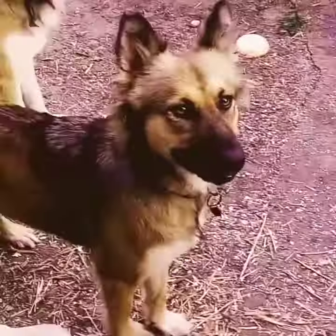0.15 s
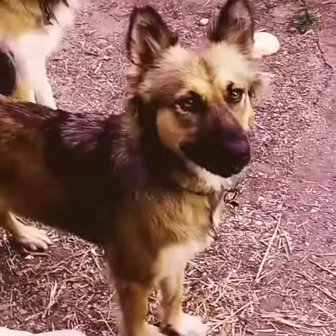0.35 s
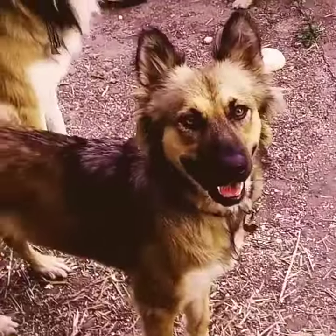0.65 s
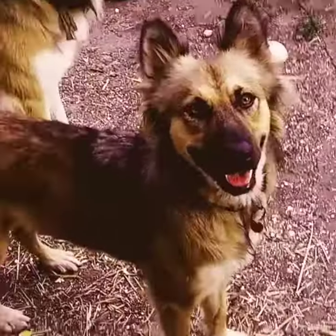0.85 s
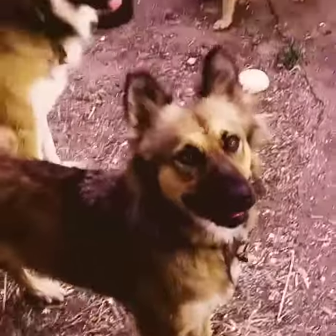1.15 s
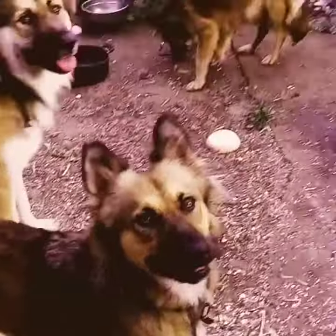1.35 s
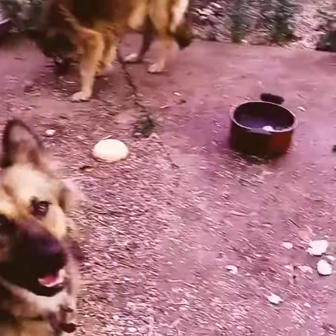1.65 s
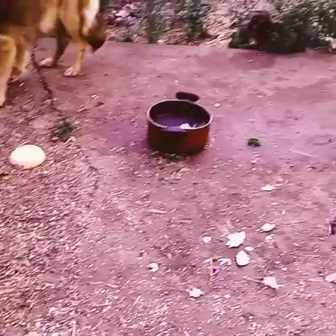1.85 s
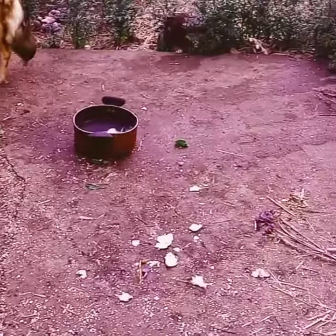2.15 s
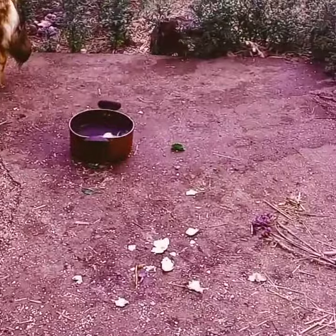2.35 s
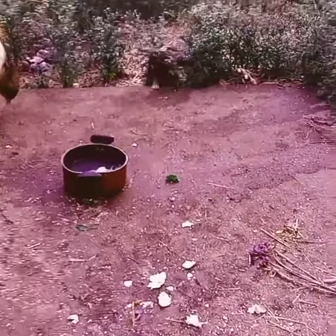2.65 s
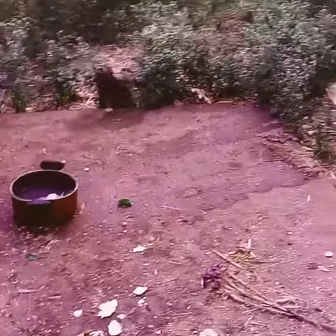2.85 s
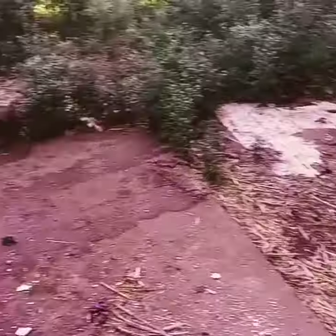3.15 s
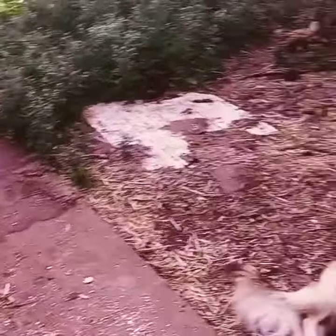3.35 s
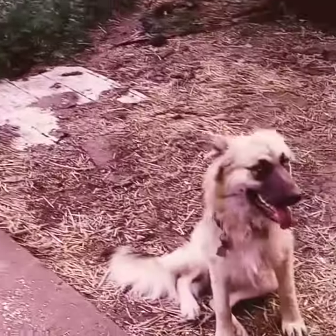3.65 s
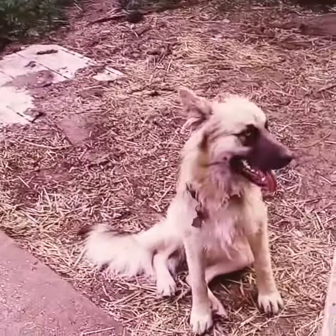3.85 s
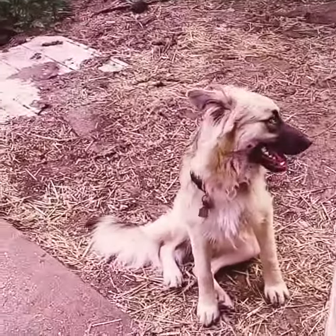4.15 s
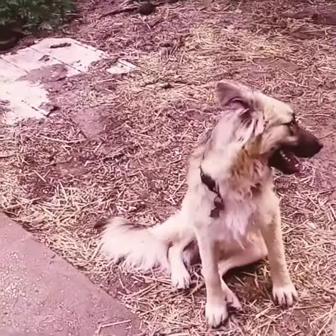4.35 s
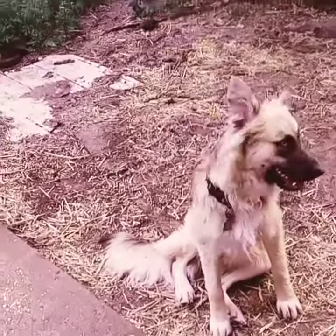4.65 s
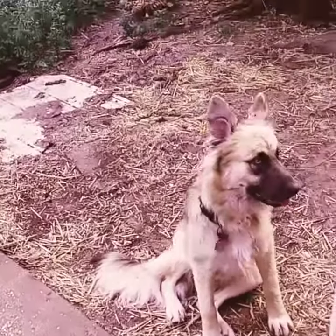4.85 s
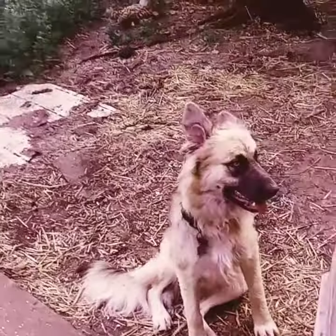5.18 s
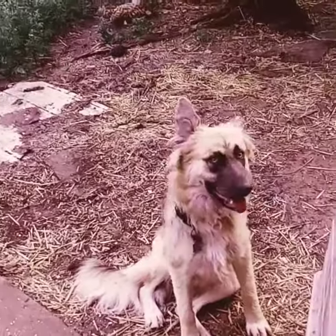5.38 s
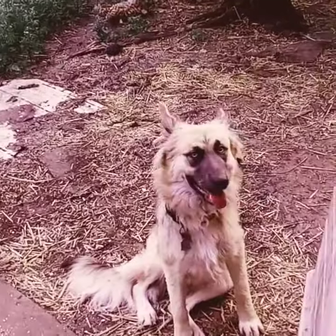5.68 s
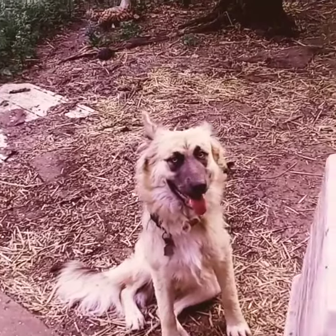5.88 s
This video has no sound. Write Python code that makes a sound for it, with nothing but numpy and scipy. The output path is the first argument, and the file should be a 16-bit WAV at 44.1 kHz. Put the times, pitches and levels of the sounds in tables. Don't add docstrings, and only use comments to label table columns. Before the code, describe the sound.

Outdoors in a dirt yard, a rubber squeaker toy is squeezed rapidly very close to a phone. Shrill, nasal, whining squeaks alternate between the outward squeeze and lower inward release, loudest and highest around one and a half seconds. Collar tags tick near one second. After nearly four seconds comes a quiet gap with distant hum, small ticks and an airy leak, then duller, rougher squeaks to the end. A nearby wall returns short echoes.

```python
import sys
import numpy as np
from scipy import signal
from scipy.fft import rfft, irfft, next_fast_len
from scipy.io import wavfile
from scipy.ndimage import uniform_filter1d

SR = 44100
rng = np.random.default_rng(int(sys.argv[2]) if len(sys.argv) > 2 else 0)


def gain_from_db(level_db):
    decades = np.asarray(level_db, float) / 20
    return 10 ** decades


def dump(signal):
    limited = np.clip(np.atleast_2d(signal).T, -1, 1)
    pcm = np.round(limited * 32767).astype(np.int16)
    wavfile.write(sys.argv[1], SR, pcm)


N = 265482

# hz, level_db (per Hz)
YARD_SPECTRUM = [(15, -42), (25, -2.5), (152, -1.5), (537, -22), (782, -8.5), (871, -16.5), (1380, -12),
                 (1710, -17.5), (2010, -15.5), (4870, -24), (5430, -19.5), (6040, -26), (9290, -24.5),
                 (15500, -68)]
YARD_DB = -44.5
# time_s, above_4_khz_db
YARD_TREBLE = [
    (0, 9),
    (2.0, 1),
    (4.0, -2.5),
    (5.0, -2),
]
# pitch_hz, level_db
WHINES = [(1384, -57), (5351, -61.5), (9109, -62.5)]
WHINE_FROM_S = 3.4
TAG_HZ = [6300, 8100, 11960, 15250]
# time_s, level_db
JINGLE = [
    (.84, -62),
    (.9, -54.5),
    (1.22, -55.5),
]
# start_s, peak_db, ring_hz, crack_db
TICKS = [
    (1.114, -13.5, 8540, -8.5),
    (1.155, -30, 470, -6),
    (1.183, -26.5, 2400, 0.5),
    (4.285, -25, 340, -6),
    (4.375, -25, 1060, 2),
    (4.429, -29, 3650, -2),
    (4.863, -20.5, 2530, -11),
]
# time_s, level_db, centre_hz
LEAKS = [
    [(4.47, -71, 6950), (4.52, -42.5, 7000), (4.555, -41, 6430)],
    [(4.77, -39, 5000), (4.85, -42, 4900), (4.935, -40, 5000), (4.955, -71, 5150)],
]
# delay_s, level_db
ECHOES = [
    (.0021, -51),
    (.0068, 2),
    (0.057, -19.5),
]
TAIL_DB, TAIL_T60_S, TAIL_TREBLE_T60_S = -14.5, 0.54, 0.44
# time_s, level_db
FACING = [
    (0, -10),
    (1.0, -8),
    (2.0, -7.5),
    (3.9, -9.5),
    (4.6, -3.5),
]

# start_s, pressure_top_s, end_s, top_pitch_hz, top_level_db
SQUEEZES = [(0.0314, 0.058, 0.125, 1170, -9), (0.2877, 0.322, 0.378, 1059, -9),
            (0.5275, 0.561, 0.617, 1066, -9.5), (1.2275, 1.256, 1.343, 1292, -5.5),
            (1.4987, 1.568, 1.658, 1552, -3.5), (1.8288, 1.924, 1.966, 1325, -5.5),
            (2.1731, 2.233, 2.292, 1112, -6.5), (2.4681, 2.485, 2.578, 1073, -8.5),
            (2.7468, 2.781, 2.859, 1122, -8), (3.0233, 3.053, 3.123, 1065, -10),
            (3.5208, 3.576, 3.646, 1220, -5.5), (4.556, 4.602, 4.621, 905, -16),
            (5.2196, 5.275, 5.348, 1280, -8.7), (5.5145, 5.543, 5.644, 1030, -13),
            (5.7883, 5.809, 5.919, 1044.0, -13)]
# start_s, pressure_top_s, end_s, top_pitch_hz, top_level_db
RELEASES = [(0.1999, 0.228, 0.264, 854, -12.5), (0.4387, 0.455, 0.512, 879, -10.5),
            (0.6754, 0.788, 0.838, 937.5, -11.5), (1.3808, 1.423, 1.483, 920, -12),
            (1.6811, 1.718, 1.813, 1405, -8.5), (1.9914, 2.034, 2.158, 971, -11),
            (2.3423, 2.384, 2.446, 911, -11.0), (2.6241, 2.655, 2.73, 937, -11),
            (2.9117, 2.945, 3.009, 913.0, -12), (3.2032, 3.342, 3.373, 833.0, -13.0),
            (3.7156, 3.84, 3.873, 874, -11), (4.702, 4.739, 4.777, 859, -11.5),
            (5.0283, 5.065, 5.112, 894, -11.5), (5.3846, 5.469, 5.5, 1057, -11),
            (5.6762, 5.724, 5.771, 924, -14), (5.9545, 6.005, 6.038, 1082, -12)]
# above_10_khz_db, tilt_db (per octave), outlet_ring_hz, roughness (0-1)
SQUEEZE_GRIPS = [(-25, -5.5, 7200, 0.41), (-21.5, -2.5, 7120, 0.39), (-25, -2, 6900, 0.36),
                 (-30, -1, 7950, 0.39), (-30, -0.5, 7800, 0.4), (-25.5, 3, 7490, 0.5),
                 (-26.5, 3, 7620, 0.2), (-22, 0, 7580, 0.4), (-25.5, 0, 7480, 0.26), (-31, 0.5, 7660, 0.34),
                 (-26.5, -0.5, 7800, 0.4), (-49.5, 2, 6360, 0.42), (-53, -8, 6250, 0.46),
                 (-39.5, -7.5, 6620, 0.61), (-44.5, -8, 7180, 0.64)]
RELEASE_GRIPS = [(-42, -6.5, 7940, 0.15), (-29, -5.5, 8140, 0.27), (-33, 2.5, 8020, 0.24),
                 (-36, 2, 8020, 0.36), (-40, 4, 7900, 0.41), (-37, 5, 7900, 0.36), (-36, 3.5, 7960, 0.4),
                 (-36, 3.5, 8070, 0.063), (-39, 3, 8070, 0.26), (-35.5, 4, 8080, 0.076),
                 (-33, -1, 8020, 0.21), (-36.5, 0.5, 8220, 0.51), (-38, -2, 8280, 0.57),
                 (-35.5, -11.5, 7960, 0.5), (-36, -8.5, 8100, 0.84), (-37, -11.5, 7930, 0.97)]
# ring_at_start_db, ring_at_end_db
SQUEEZE_PUSHES = [(1044.0, 0.78, 1.05, 4.5, 4), (967, 1.7, 1.54, 4.5, 1), (943, 0.74, 1.27, 2, -3.5),
                  (995, 0.28, 1.5, 1.5, 2), (924, 0.63, 1.2, -0.5, 4), (950, 3.2, 0.37, 0.5, 1),
                  (983, 6, 1.66, 4, 3.5), (963, 1.5, 3.6, -1, 2.5), (950, 1.61, 2.35, 0.5, 3),
                  (990, 0.48, 2.28, 0.5, -3), (1037, 2.6, 1.4, -3, 0.5), (960, 0.56, 1, -19, -22),
                  (1023, 0.59, 0.94, -16.5, -8), (925, 0.83, 0.99, -8, -11.5), (994, 0.67, 1.31, -8, -4)]
RELEASE_PUSHES = [(795, 8.8, 1.4, -1.5, 2.5), (849, 0.53, 2.7, -3.5, 3.5), (788, 0.4, 0.83, -2, -9),
                  (830, 1.86, 2.2, -1.5, -2.5), (800, 1, 0.77, 0, -3.5), (900, 0.48, 2.62, 0, -4.5),
                  (860, 1.2, 1.7, -1, 0), (842, 0.64, 2.09, -1.5, -3.5), (833.0, 1.23, 1.8, -3, -2.5),
                  (790, 6.0, 1.03, -4.5, -1.5), (828, 0.4, 0.68, -5, -2.5), (846, 5, 0.77, -16.5, 3),
                  (837, 6.0, 0.99, -16.5, 8.5), (860, 1.3, 0.23, -10, 4), (823, 3.37, 1.1, -8.5, 1),
                  (840, 0.41, 0.62, -10, 1)]
# hz, level_db
SQUEEZE_BODY = [(850, -19.5), (1100, -16), (1700, -11.5), (2250, -2), (2900, -4.5), (3600, 1), (4150, -0.5),
                (4750, -12), (5600, -10), (7600, 3.5), (8500, -5), (9600, -21.5), (15500, -30)]
RELEASE_BODY = [(850, -19), (1700, -11), (2300, 0.5), (2900, -4.5), (3800, -2.5), (4400, -9.5), (5000, -18),
                (6400, -26), (8000, -5), (9000, -11), (10100, -26.5), (11600, -43), (15500, -49.5)]
# time_s, half_width_s, pitch_shift_hz, outlet_ring_db, level_db
TWITCHES = [(0.714, 0.051, 117.5, 2, 1.5), (0.755, 0.019, -2, -11, 3.5), (0.776, 0.0086, 54.5, -6, 2),
            (0.794, 0.0038, 56, -4.5, 3), (1.266, 0.026, 325, 2, -1), (1.598, 0.024, 312.0, -6, -1.5),
            (1.696, 0.0065, -59.5, 0, -0.5), (1.861, 0.015, -111.0, 1.5, 0.5), (2.04, 0.021, 431.5, 0, 0),
            (3.213, 0.035, 52, -1, 1), (3.303, 0.01, 21, 0, 0.5), (3.336, 0.011, 36.5, -1.5, 1.5),
            (3.575, 0.02, 7, -4, 3.5), (3.741, 0.032, 29.5, -1.5, 1), (3.799, 0.013, 20.5, -2, -0.5),
            (5.302, 0.018, 152, -9, -1.5), (5.312, 0.007, 13, -10, 4.5), (5.464, 0.0035, 110, -10, -1),
            (5.611, 0.021, 48, 5, 0), (5.721, 0.008, 245.5, 0, -0.5), (5.902, 0.014, 48, -6, 0.5),
            (5.998, 0.0033, 139, 0, 0)]
SQUEEZE_STOP_HZ, RELEASE_STOP_HZ = 869, 725
RUBBER_S = 0.011
CLOSE_S, CLOSE_DB = 0.0055, -8.5
POP_S, POP_DB = 0.0048, 2
RISE_DB, SAG_DB, COVERED_DB = 8.5, 9, 0.33
WAVER_DB = 1.2


def colour(table, hz):
    at, db = np.transpose(table)
    return np.interp(np.log(np.maximum(hz, 1)), np.log(at), db)


def shaped(table, size):
    spectrum = rfft(rng.standard_normal(size))
    x = irfft(spectrum * gain_from_db(colour(table, np.fft.rfftfreq(size, 1 / SR))), size)
    return x / np.std(x)


def walk(rate, size):
    k = int(SR / rate)
    levels = np.repeat(rng.standard_normal(size // k + 1), k)
    return 1.81 * uniform_filter1d(uniform_filter1d(levels, k), k)[:size]


def curve(table):
    return gain_from_db(np.interp(np.arange(N) / SR, *np.transpose(table)))


def add(out, x, start_s):
    i = int(start_s * SR)
    out[i:i + len(x)] += x[:len(out) - i]


def above(hz, edge_hz, width_hz):
    return 1 / (1 + np.exp((edge_hz - hz) / width_hz))


def yard():
    noise = shaped(YARD_SPECTRUM, N)
    t = np.arange(N) / SR
    bass = signal.sosfilt(signal.butter(2, 350, fs=SR, output="sos"), noise)
    treble = signal.sosfiltfilt(signal.butter(2, 4000, "high", fs=SR, output="sos"), noise)
    noise = noise + treble * (curve(YARD_TREBLE) - 1)
    gusts = gain_from_db(3 * walk(18, N) + walk(3, N))
    noise = (noise - bass) * gain_from_db(2 * walk(9, N)) + bass * gusts
    whines = np.zeros(N)
    for hz, db in WHINES:
        level = gain_from_db(db + 3 + 3.0 * walk(6, N))
        drift = hz / 4500 * walk(hz / 25, N)
        whines += level * np.sin(2 * np.pi * hz * t + drift)
    return noise * gain_from_db(YARD_DB) + whines * np.where(t > WHINE_FROM_S, 1, .25)


def jingle():
    t = np.arange(N) / SR
    s, db = np.transpose(JINGLE)
    touched = rng.random(N) < 900 / SR
    touches = rng.standard_normal(N) * touched * gain_from_db(np.interp(t, s, db, -120, -120))
    t = t[:4000]
    ring = np.zeros(4000)
    for hz in TAG_HZ:
        ring += np.sin(2 * np.pi * hz * t) * np.exp(-t * (hz / 1700) ** 3) * 5000 / hz
    return signal.fftconvolve(touches, ring)[:N]


def ticks():
    out, t = np.zeros(N), np.arange(8000) / SR
    for s, db, hz, crack_db in TICKS:
        ring = np.sin(2 * np.pi * hz * t) * gain_from_db(-60 * t / 0.082)
        crack = shaped([(300, 5), (1000, 2.5), (4000, -1), (9000, -15.5), (16000, -21)], len(t))
        crack = crack * np.exp(-t / 0.015)
        add(out, gain_from_db(db - 12.0) * (ring + gain_from_db(crack_db) * crack), s)
    return out


def leaks():
    out, t = np.zeros(N), np.arange(N) / SR
    for rows in LEAKS:
        s, db, hz = np.transpose(rows)
        centre = hz.mean()
        hiss = shaped([(centre / 8, -20), (centre / 2.2, -2), (centre, 0),
                       (9600, -4), (10500, -20), (16000, -30)], N)
        out += hiss * gain_from_db(np.interp(t, s, db, -120, -120))
    return out


def walls(x):
    t = np.arange(SR) / SR
    noise = rng.standard_normal(SR)
    dull = signal.sosfilt(signal.butter(1, 5000, fs=SR, output="sos"), noise)
    tail = dull * gain_from_db(-60 * t / TAIL_T60_S) + (noise - dull) * gain_from_db(-60 * t / TAIL_TREBLE_T60_S)
    tail *= 1 - np.exp(-(t / 0.03) ** 2)
    response = gain_from_db(TAIL_DB) * tail / np.sqrt(np.sum(tail ** 2))
    out = signal.fftconvolve(x * (0.82 + 1.14 * walk(260, N)), response)[:N]
    for delay_s, db in ECHOES:
        add(out, gain_from_db(db) * x, delay_s)
    return signal.sosfilt(signal.butter(1, 1800, "high", fs=SR, output="sos"), out)


def ducking(x):
    loud = uniform_filter1d(x ** 2, size=400)
    held = signal.lfilter([1 / (0.037 * SR)], [1, 1 / (0.012 * SR) - 1], loud)
    return (1 + np.maximum(loud, held) / gain_from_db(-35) ** 2) ** -.52


def press(row, push, rough, stop_hz, t):
    start_s, top_s, end_s, top_hz, db = row
    onset_hz, rise, fall, first_db, last_db = push
    before = np.clip((top_s - t) / (top_s - start_s), 0, 1)
    after = np.clip((t - top_s) / (end_s - top_s), 0, 1)
    pitch = top_hz - (top_hz - onset_hz) * before ** rise - (top_hz - stop_hz) * after ** fall
    pitch = uniform_filter1d(pitch, int(RUBBER_S * SR), mode="nearest")
    ring_db = first_db + (last_db - first_db) * (t - start_s) / (end_s - start_s)
    ring_db = ring_db + WAVER_DB * walk(57.3, len(t))
    for s, width, shift_hz, cover_db, extra_db in TWITCHES:
        twitch = np.exp(-((t - s) / width) ** 2) * (start_s < s < end_s)
        pitch = pitch + shift_hz * twitch
        ring_db = ring_db + cover_db * twitch
        db = db + extra_db * twitch
    pressure = np.log10(np.clip((pitch - stop_hz) / (top_hz - stop_hz), .03, None))
    slope_db = np.where(t < top_s, RISE_DB, SAG_DB + COVERED_DB * max(-first_db, 0))
    waver = walk(60, len(t)) + walk(200, len(t))
    fade = db + slope_db * pressure + WAVER_DB * min(rough, .6) * waver
    fade = fade + POP_DB * np.exp((start_s - t) / POP_S) + CLOSE_DB * np.exp((t - end_s) / CLOSE_S)
    return pitch, fade, ring_db


def squeak(row, push, grip, shape, stop_hz, open_hz, hiss_db):
    top_db, tilt_db, ring_hz, rough = grip
    t = row[0] + np.arange(int((row[2] - row[0] + .012) * SR)) / SR
    size = len(t)
    pitch, fade, ring_db = press(row, push, rough, stop_hz, t)
    falling = np.clip(-np.gradient(pitch) * SR / 6000, 0, 1)
    tremor = .0008 + .004 * rough + .018 * rough ** 2 * falling
    pitch = pitch * (1 + (0.00108 + 0.00514 * rough) * walk(123.2, size) + tremor * walk(1200, size))
    phase = 2 * np.pi * np.cumsum(pitch) / SR
    k = np.arange(1, 24)[:, None]
    f = k * pitch
    seen = f * (open_hz / ring_hz) ** above(f, 5500, 300)
    cupping_db = tilt_db * np.log2(np.clip(f, 2300, 4300) / 2300)
    shade_db = np.clip(-4 - ring_db, 0, 10)
    cupping_db = cupping_db + 0.93 * shade_db * np.exp(-((f - 2700) / 450) ** 2)
    gain = gain_from_db(colour(shape, seen) + cupping_db) * (f < 17000)
    waver_db = (0.34 + 4.2 * min(rough, .8)) * np.clip(k / 3, 0, 1) * (1 + (f > 10000))
    gain = gain * gain_from_db(waver_db * np.array([walk(93.6, size) for _ in k]))
    high, top = above(f, 5500, 150), above(f, 10400, 200)
    parts = [1 - high, high * (1 - top), top]
    ring = gain_from_db(ring_db)
    weights = [1, ring, gain_from_db(top_db) * np.sqrt(1 + ring ** 2)]
    levelled = 0
    for part, weight in zip(parts, weights):
        band = part * gain
        levelled = levelled + weight * band / np.sqrt(np.sum(band ** 2, axis=0))
    tone = np.sum(levelled * np.sin(k * phase - 0.18 * k ** 2), axis=0)
    tone = tone * np.sqrt(2 / (1 + ring ** 2))
    air = shaped([(450, -60), *shape], next_fast_len(size))[:size]
    air = air * (1 + 0.39 * np.cos(phase)) * (1.1 + ring)
    air = air * (.04 + rough) * (1 + 3.4 * rough * falling) * (pitch / 1000) ** 2.5
    snap = 1 - np.exp(-(t - row[0]) / 0.00089)
    return (tone + gain_from_db(hiss_db) * air) * gain_from_db(fade) * snap


def toy():
    out = np.zeros(N)
    # ring of the open outlet in Hz, hiss in dB
    strokes = ((SQUEEZES, SQUEEZE_PUSHES, SQUEEZE_GRIPS, SQUEEZE_BODY, SQUEEZE_STOP_HZ, 7600, -25),
               (RELEASES, RELEASE_PUSHES, RELEASE_GRIPS, RELEASE_BODY, RELEASE_STOP_HZ, 8000, -30))
    for table, pushes, grips, *stroke in strokes:
        for row, push, grip in zip(table, pushes, grips):
            add(out, squeak(row, push, grip, *stroke), row[0])
    return out


def scene():
    near = toy()
    duck = ducking(near)
    back = walls(near) * curve(FACING)
    around = yard() + leaks() + ticks() + jingle()
    return (near + back * duck ** 0.38 + around * duck)[None]


def roll_off(x):
    return signal.sosfilt(signal.butter(12, 15640, fs=SR, output="sos"), x)


def record(dry):
    dry = signal.sosfilt(signal.butter(2, 55, "high", fs=SR, output="sos"), dry)
    dry = dry - 0.23 * signal.lfilter(*signal.iirpeak(1420, 4.0, fs=SR), dry)
    clipped = np.clip(dry, -.9, .9)
    clipped = signal.sosfilt(signal.butter(1, 30, "high", fs=SR, output="sos"), clipped)
    return roll_off(clipped)


dry = scene()
out = record(dry)
dump(out)
```